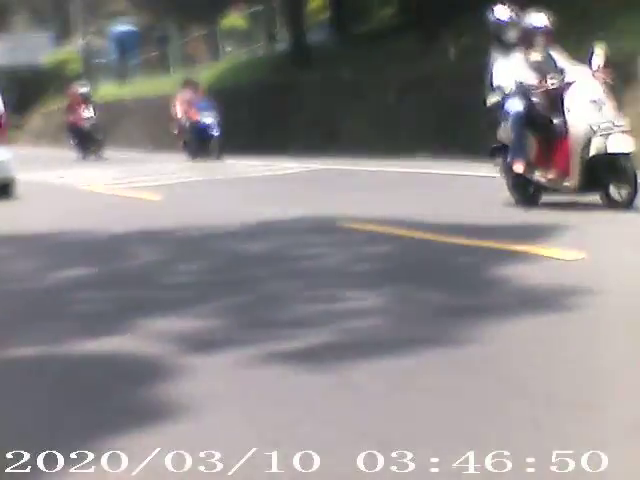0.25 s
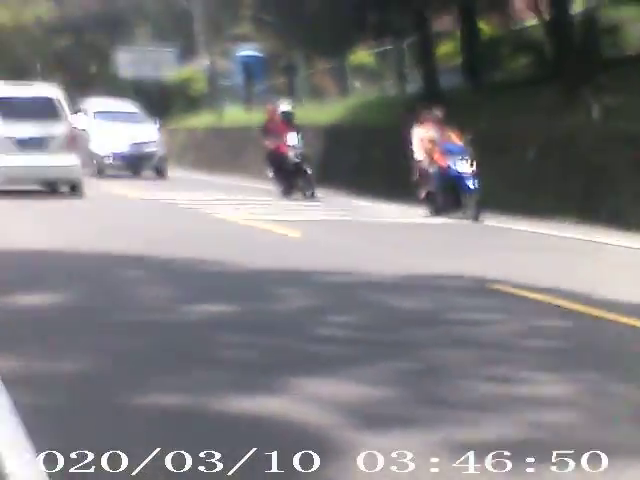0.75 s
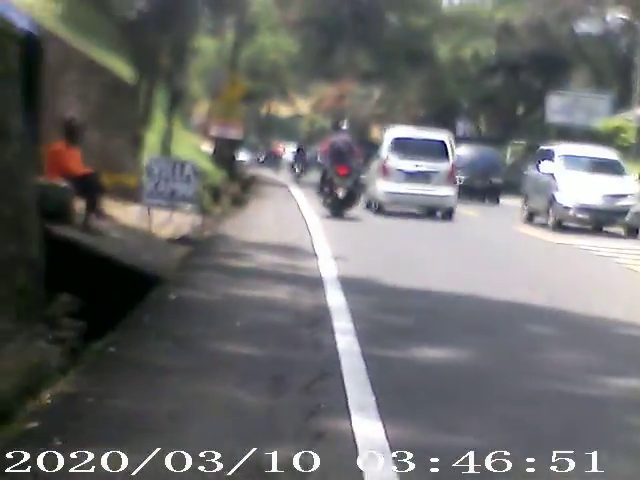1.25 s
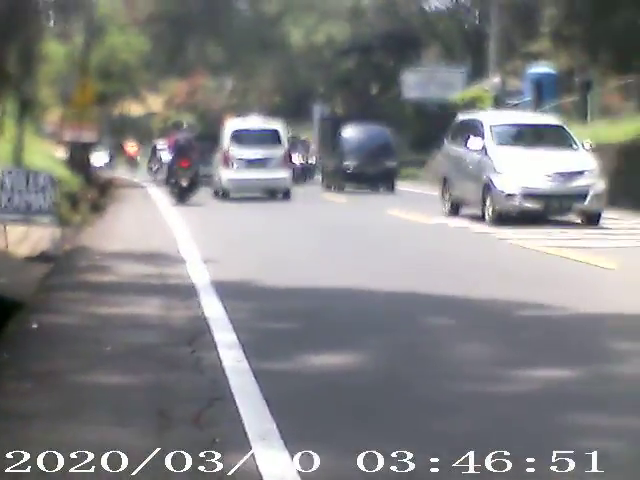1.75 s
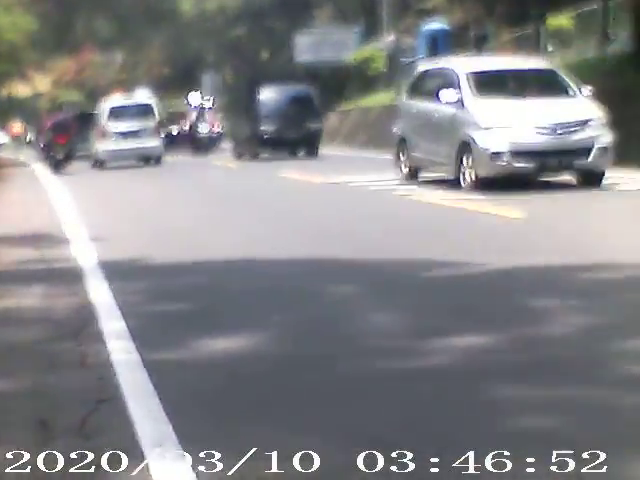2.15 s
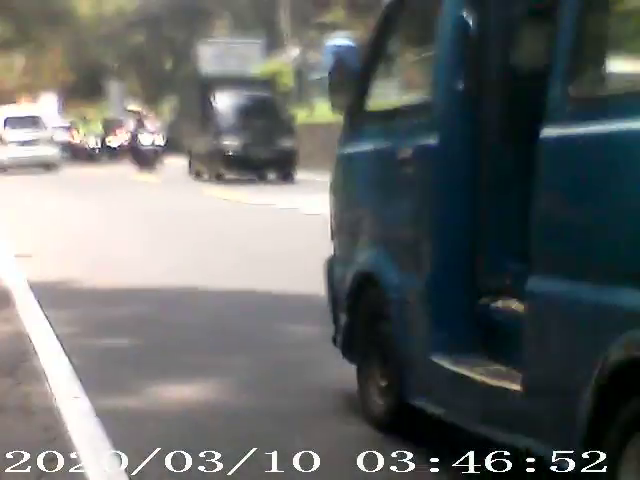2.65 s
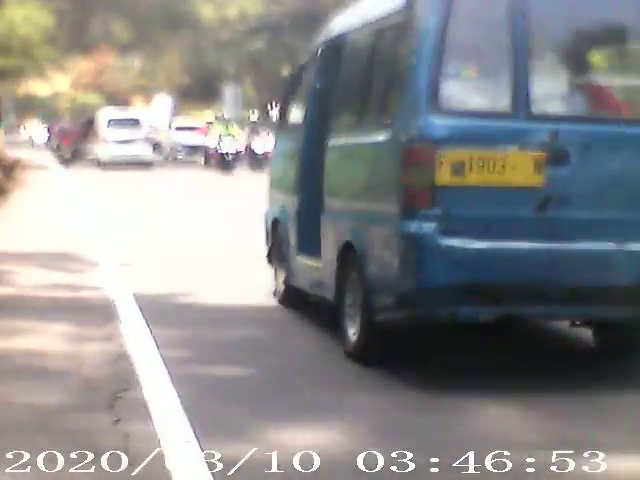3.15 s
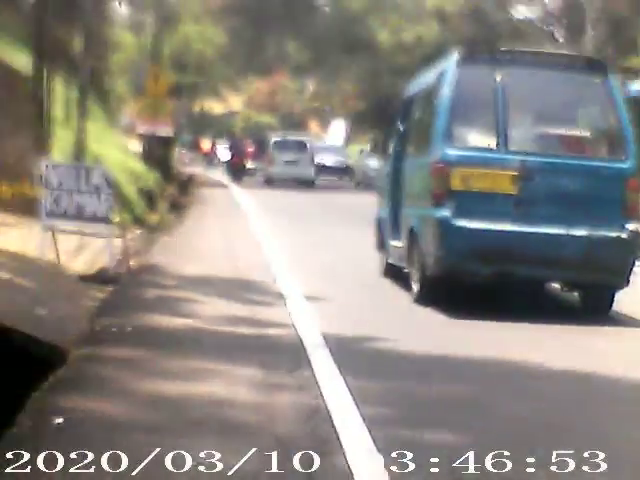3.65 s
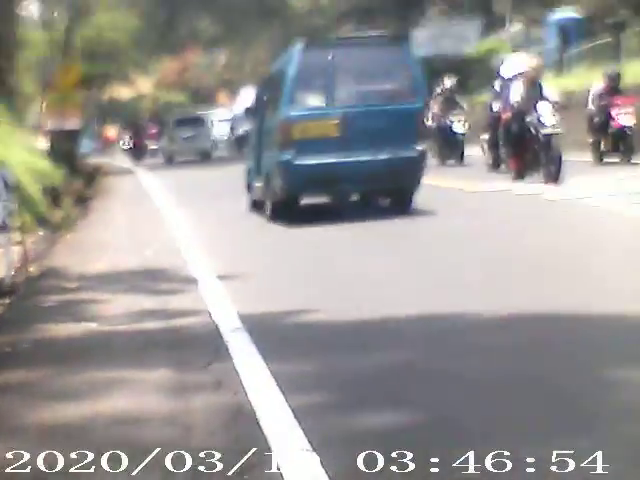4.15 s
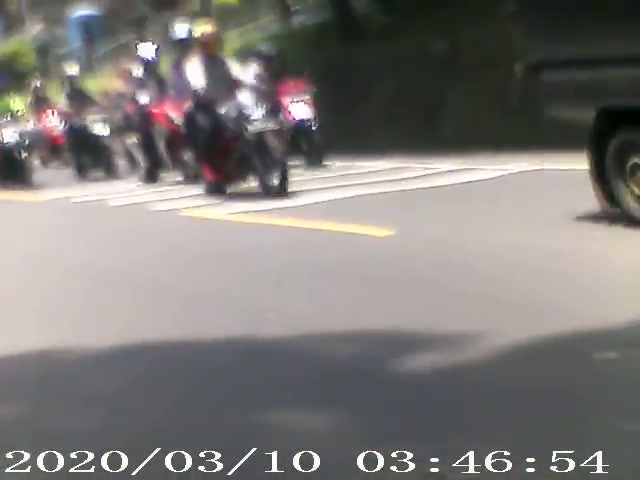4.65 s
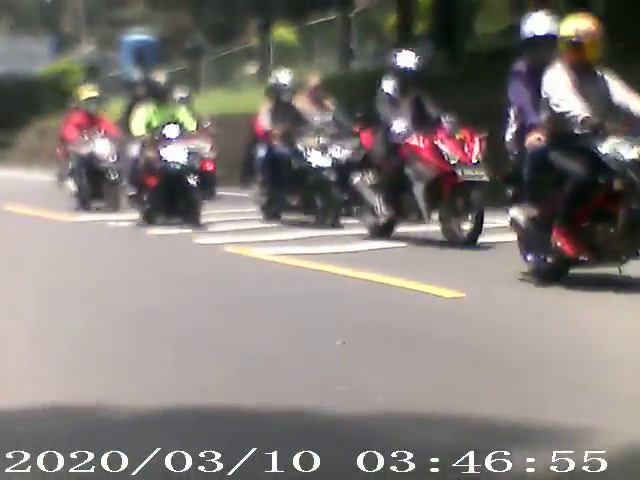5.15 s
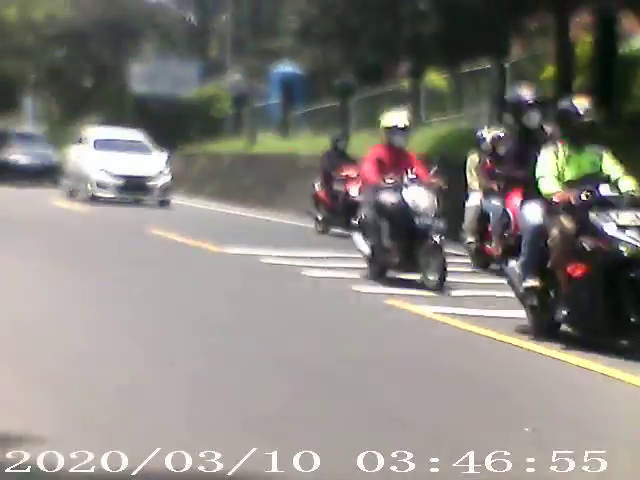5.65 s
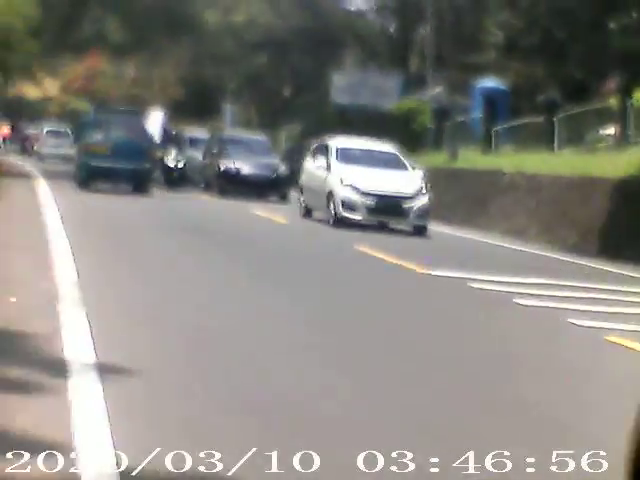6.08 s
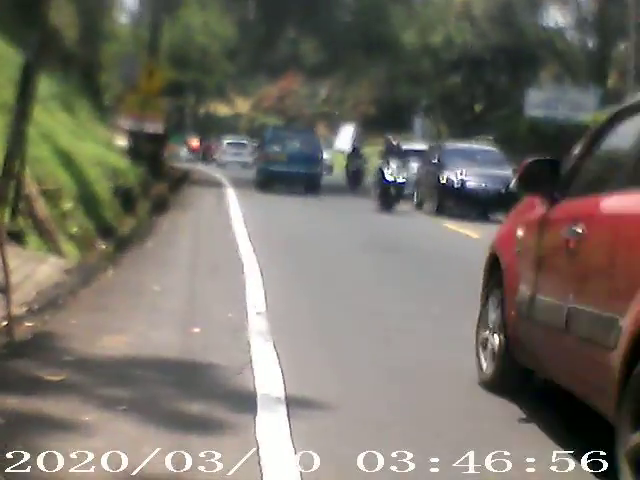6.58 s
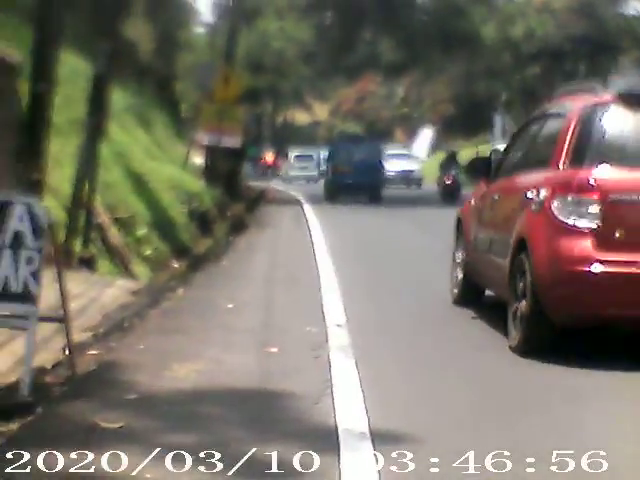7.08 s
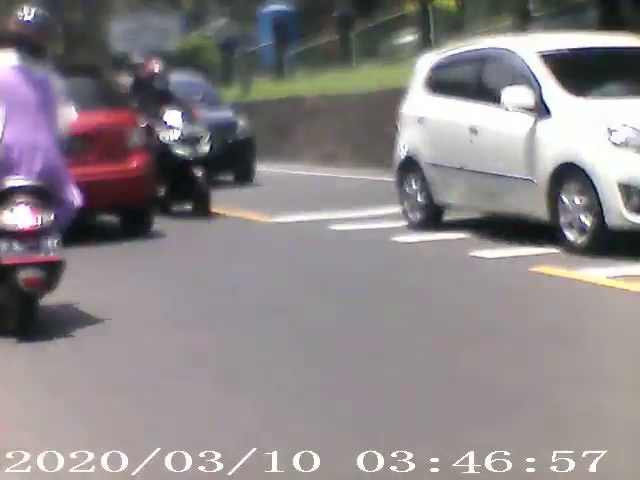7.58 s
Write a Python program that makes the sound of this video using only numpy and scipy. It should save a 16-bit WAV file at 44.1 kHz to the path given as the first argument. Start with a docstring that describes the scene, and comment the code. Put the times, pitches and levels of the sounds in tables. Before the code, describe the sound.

A small camera on a bicycle hears its plastic housing up close as it rolls along rough asphalt beside traffic. A steady, slightly gusting rush of wind and tyres lies over low frame rumble and buzzing vibration. Fine ticks, dull clacks and tiny squeaks run throughout. Knocks come at about 0.4, 0.6 and a stronger one at 1.0 seconds, then scattered softer ones until 3.6. A jolt hits at 3.9, two hard cracking slams at 4.6 and 4.8, and a rougher cluster from 5.4 to 5.9. After a calmer stretch, knocks pile up from 6.6 into a violent, clipped bang at 6.7 with a deep heave. Right afterwards, a car's faint two-note engine whine sinks with a whirr and tyre roar, fading by 7.4. Light rattling and rush continue to the end near 7.8. The microphone is narrow-band, mono and distorts on peaks.

```python
"""The plastic housing of a small camera ticks, clacks and knocks on its mount on a bicycle.
The bicycle rolls along the rough edge of a busy mountain road; the worst bumps overload the microphone.
Pushes, skids and taps ring the resonances of the housing; slams also shake the microphone directly.
Shaped noise makes the frame's rumble, the wind and the traffic.
Late on, an overtaking car adds a sinking two-note engine whine, a whirr and a tyre roar."""
import sys
import numpy as np
from scipy import signal
from scipy.fft import rfft, irfft
from scipy.io import wavfile
from scipy.ndimage import uniform_filter1d

SR = 44100
rng = np.random.default_rng(int(sys.argv[2]) if len(sys.argv) > 2 else 0)


def wav_record(signal):
    """Record a signal, one row per channel, as 16-bit PCM in the file named by sys.argv[1]."""
    frames = np.transpose(np.atleast_2d(signal))
    bounded = np.clip(frames, -1, 1)
    # unit amplitude maps onto the largest positive 16-bit level
    quanta = np.round(bounded * 32767).astype(np.int16)
    wavfile.write(sys.argv[1], SR, quanta)


N = 344862
SECONDS = np.arange(N) / SR
HIT = SECONDS[:8192]  # the time axis of one short blow, in seconds

# The overtaking car. Each row: time in seconds, pitch of the upper whine note in Hz before its wobble,
# level of the engine in dB (the tyre roar follows it, louder).
OVERTAKING = [(6.7, 1112, -110), (6.82, 1106, -52), (7.0, 1095, -48), (7.1, 1075, -49), (7.25, 1045, -57),
              (7.45, 1030, -110)]


def undb(db):
    """Turn decibels into a gain."""
    return 10 ** (np.asarray(db) / 20)


def unit(x):
    """Scale to an rms level of 1."""
    return x / np.sqrt(np.mean(x ** 2))


def curves(rows):
    """Join each column of a table by straight lines in time; the first column holds the seconds."""
    s, *columns = np.transpose(rows)
    return [np.interp(SECONDS, s, c) for c in columns]


def add(out, s, x):
    """Mix the sound x into out, starting at s seconds."""
    start = max(int(s * SR), 0)
    out[start:start + len(x)] += x[:max(N - start, 0)]


def butter(x, hz, kind, order=2):
    """Low-pass or high-pass filter."""
    return signal.sosfilt(signal.butter(order, hz, kind, fs=SR, output="sos"), x)


def resonate(x, hz, width_hz):
    """One resonance, with gain 1 at its centre."""
    return signal.lfilter(*signal.iirpeak(hz, hz / width_hz, fs=SR), x)


def noise(points):
    """Noise of rms 1 whose spectrum runs through (Hz, dB) points."""
    hz, db = np.transpose(points)
    bins = np.maximum(np.fft.rfftfreq(N, 1 / SR), 1)
    gain = undb(np.interp(np.log(bins), np.log(hz), db))
    return unit(irfft(rfft(rng.standard_normal(N)) * gain, N))


def walk(rate):
    """A smooth random curve of rms 1 that changes direction up to about rate times a second."""
    hold = int(SR / rate)
    steps = np.repeat(rng.standard_normal(N // hold + 1), hold)
    return unit(uniform_filter1d(steps, hold))[:N]


def impacts(rate, spread_db):
    """Impulses at random moments, about rate per second, of random sign and size."""
    chance, size = rng.random(N), rng.standard_normal(N)
    sign = rng.choice([-1, 1], N)
    return (chance < rate / SR) * sign * undb(spread_db * np.minimum(size, 1.4))


def moments(level_db, spread_db, count):
    """Rows (s, dB) of small events: one at random in each of count equal stretches, around a level curve."""
    place, size = rng.random((count, 2)).T
    at = ((np.arange(count) + place) * N / count).astype(int)
    return list(zip(SECONDS[at], level_db[at] + spread_db * (2 * size - 1)))


def follow(shake_db, level_db, slope, usual_db=-37):
    """The level in dB of a layer driven by the shaking: level_db when the shaking is usual."""
    return level_db + slope * (shake_db - usual_db)


def jolts(settle_s, rise_s=0.044):
    """Extra shaking in dB: for each broken patch it rises, holds and settles."""
    # Broken patches of road. Each row: start in seconds, length in seconds, extra shaking in dB.
    patches = [(3.874, 0.095, 4.5), (4.587, 0.11, 6.5), (5.607, 0.17, 6), (6.656, 0.124, 20.5)]
    total = np.zeros(N)
    for s, length, db in patches:
        corners = [s - rise_s, s, s + length, s + length + settle_s]
        total += np.interp(SECONDS, corners, [0, db, db, 0])
    return total


def housing(force):
    """The plastic housing answers a force with all its resonances at once."""
    # Its resonances. Each row: frequency in Hz, width in Hz, gain in dB.
    modes = [(207.6, 13, -4.5), (243.5, 33, -4.5), (319.5, 30, -3.5), (385.6, 25, 6), (445, 80, 0),
             (535.4, 37.7, 10.5), (567, 16, 7), (749, 76, -4), (992, 210, -6), (1270, 49, -0.5),
             (1392, 98, 3.5), (1579, 690, -6.5), (1961, 390, -0.5), (2185, 80, -22.5), (2334, 94, -12.5),
             (3085, 168, -3), (3335, 43, -13), (4176, 360, -2.5), (4700, 390, -18.5), (5640, 310, -12.5),
             (6400, 450, -59.5)]
    return sum(undb(db) * resonate(force, hz, width) for hz, width, db in modes)


def strike(force, db, size=882):
    """Ring the housing so that its first size samples have the rms level db."""
    ring = housing(force)
    return ring * undb(db) / np.sqrt(np.mean(ring[:size] ** 2))


def chatter(decay_s):
    """The force of two faces that meet and skid: a rough burst that swells and dies."""
    age = HIT / decay_s
    return age * np.exp(-age) * rng.standard_normal(len(HIT))


def ping(hz, swell_s=0.00095, rough=0.042):
    """A thin plastic edge squeaks with a rough pitch for a few milliseconds as it slips."""
    wobble = unit(uniform_filter1d(rng.standard_normal(len(HIT)), size=30))
    age = HIT / swell_s
    phase = 2 * np.pi * np.cumsum(hz * (1 + rough * wobble)) / SR
    return age ** 2 * np.exp(-age) * np.sin(phase)


def wind_and_traffic(level_db):
    """Air and passing tyres rush: shaped noise with slow, slight gusts."""
    # Colour of the rush. Each row: frequency in Hz, relative level in dB per Hz.
    rush_colour = [(100, -2.5), (180, 8), (450, 18.5), (750, 2.5), (1100, 9), (1380, 15.5), (1650, 7),
                   (2200, 9), (3700, -4), (4400, -5.5), (7000, -22.5)]
    return noise(rush_colour) * undb(level_db + 0.33 * walk(1.7))


def overtaking_engine(whirr_hz=4100, whirr_db=-5):
    """An engine goes by: a wavering two-note whine that sinks, and a whirr of narrow noise."""
    hz, db = curves(OVERTAKING)
    phase = 2 * np.pi * np.cumsum(hz * (1 + 0.0041 * walk(25))) / SR
    whine = np.sin(phase) + np.sin(.812 * phase)  # the second note is lower
    whirr = undb(whirr_db) * unit(resonate(rng.standard_normal(N), whirr_hz, 160))
    return (whine + whirr) * undb(db)


def overtaking_tyres(roar_hz=500, roar_width_hz=130, roar_db=13):
    """The tyres of the overtaking car roar as narrow noise, swelling and fading with its engine."""
    _, db = curves(OVERTAKING)
    roar = resonate(rng.standard_normal(N), roar_hz, roar_width_hz)
    roar = resonate(roar, roar_hz, roar_width_hz)
    return unit(roar) * undb(db + roar_db)


def road(buzz_db, rumble_db):
    """Tyre vibration hums in the low modes of the housing and shakes the frame; wind adds to the rumble."""
    # Colour of the rumble of frame and wind. Each row: frequency in Hz, relative level in dB per Hz.
    rumble_colour = [(15, -6), (30, -6.5), (43, -0.5), (51, 6), (60, -2), (80, -12), (100, -11),
                     (130, -35.5), (220, -68)]
    buzz = unit(housing(butter(rng.standard_normal(N), 543, "low", order=3)))
    buzz = buzz * undb(buzz_db + 3.4 * walk(18))
    rumble = noise(rumble_colour) * undb(rumble_db + 2.0 * walk(6))
    return buzz + rumble


def rattle(dull_db, fine_db):
    """The grain of the asphalt keeps loose parts busy: soft ticks and dull little clacks."""
    taps = butter(impacts(rate=70, spread_db=3.0), 2700, "high", order=1)
    fine = housing(butter(taps, 4700, "low", order=5))
    skids = signal.fftconvolve(impacts(rate=65, spread_db=3.5), chatter(0.0016))[:N]
    # the skids only set the strength; fresh noise gives the grain
    grains = resonate(np.abs(skids) * rng.standard_normal(N), 2070, 1500)
    dull = housing(butter(grains, 3400, "low", order=5))
    return undb(fine_db) * unit(fine) + undb(dull_db) * unit(dull)


def tapping(tapping_db, ping_hz=2370, ping_db=-2.0, thud_db=-0.5, thud_hz=480):
    """Between the knocks the housing nudges its mount: a faint thud and a squeak of the plastic edge."""
    out = np.zeros(N)
    push = resonate(signal.unit_impulse(len(HIT)), thud_hz, 500)
    thump = strike(butter(push, 1300, "low"), thud_db)
    for s, db in moments(tapping_db, spread_db=9, count=52):
        squeak = strike(ping(ping_hz), ping_db)
        add(out, s, undb(db) * (thump + squeak))
    return out


def ticks(ticking_db, sharp_db=-3, hard_hz=2400, contact_s=0.00016, size=1024):
    """Tiny hard parts tap the housing, each a little differently, and mostly its upper modes answer."""
    # The sharpest ticks of loose parts. Each row: time in seconds, level in dB before sharp_db.
    sharp_ticks = [(0.4112, -16), (0.489, -12), (0.602, -19.5), (0.6916, -9.5), (0.841, -11.5),
                   (1.2308, -19), (1.492, -19), (1.5625, -17), (1.967, -17), (2.2268, -13), (2.3298, -5),
                   (2.368, -17), (2.4759, -9), (2.6284, -12.5), (3.029, -11), (3.4371, -13), (3.9408, -20),
                   (4.0726, -14.5), (4.288, -14), (4.4403, -17.5), (4.7257, -17.5), (4.9636, -20.5),
                   (5.457, -17.5), (5.475, -19), (5.663, -9.5), (5.728, -6), (6.1417, -11.5),
                   (6.1682, -18.5), (6.3772, -13), (6.6321, -2), (6.7363, 1.5), (6.7585, -6), (6.7684, -6),
                   (7.0045, -21), (7.2925, -22.5), (7.3866, -14.5), (7.5115, -17), (7.7591, -11)]
    out = np.zeros(N)
    tap = strike(butter(signal.unit_impulse(size), hard_hz, "high", order=1), 0, size=44)
    sharp = [(s, db + sharp_db) for s, db in sharp_ticks]
    for s, db in sharp + moments(ticking_db, spread_db=7.5, count=280):
        contact = chatter(contact_s)[:size]
        add(out, s, signal.fftconvolve(tap, contact) * undb(db) / np.linalg.norm(contact))
    return out


def slams(heave_cycles=0.57, crack_db=20, crack_hz=1400):
    """The mount bottoms out: hard chatter rings the housing and shakes the microphone; the camera heaves."""
    # Each row: start in seconds, level of the chatter in dB, its length in seconds,
    # level of the heave in dB before it dies away, pitch of the heave in Hz.
    slam_rows = [(3.864, -14, 0.0055, -6, 161), (4.638, -4.5, 0.006, 5.5, 147),
                 (4.758, -1.5, 0.0074, 3, 151), (5.680, -13, 0.0067, -3.5, 159),
                 (5.817, -12.5, 0.009, -5.5, 150), (6.677, -8.5, 0.014, 9.5, 129),
                 (6.697, 1.5, 0.0068, 17, 48.6), (6.712, -10.5, 0.013, 7, 53.7)]
    out = np.zeros(N)
    for s, db, length, heave_db, heave_hz in slam_rows:
        age = HIT / length
        force = rng.standard_normal(len(HIT)) * np.sqrt(age) * np.exp(-age ** 4)
        ring = strike(butter(force, 1800, "high", order=1), db)
        crack = butter(force, crack_hz, "low") * undb(db + crack_db)  # straight to the microphone
        heave = np.sin(2 * np.pi * heave_hz * HIT) * np.exp(-HIT * heave_hz / heave_cycles)
        add(out, s, ring + crack + undb(heave_db) * heave)
    return out


def rocking(start_hz=410, rest_hz=225, sag_s=0.0155, swell_s=0.0092, rough=0.287, size=1544):
    """The camera rocks and scrapes on its mount, shaking the housing; the rough pitch sags as it settles."""
    scrape = unit(uniform_filter1d(rng.standard_normal(len(HIT)), size=90))
    sag = rest_hz + (start_hz - rest_hz) * np.exp(-HIT / sag_s)
    hz = sag * np.exp(rough * scrape)
    swing = HIT * np.exp(-HIT / swell_s) * np.sin(2 * np.pi * np.cumsum(hz) / SR)
    return strike(butter(swing, 400, "low"), 0, size=size)


def knocks(rock_db=-3, ping_db=-2.0, thud_hz=480, snap_hz=3300, snap_db=-4, skid_s=0.0026):
    """A soft push rings the low modes; skidding plastic rings the middle ones, snaps and squeaks."""
    # Knocks of the housing on its mount. Each row: time in seconds, level of the rocking in dB before
    # rock_db, of the thud in dB, of the clack in dB, of the squeak in dB before ping_db,
    # pitch of the squeak in Hz before its wobble.
    knock_rows = [(0.388, -17.5, -20.5, -22.5, -19.5, 2380), (0.488, -45, -48, -34, -30, 2410),
                  (0.55, -32, -26.5, -39, -48, 3520), (0.617, -19.5, -11.5, -19.5, -21, 2500),
                  (0.758, -47, -45, -43, -25.5, 2390), (1.043, -12.5, -25, -14, -13, 2560),
                  (1.2, -30, -29, -37, -40, 2400), (1.664, -27.5, -46, -34, -34, 2420),
                  (1.891, -28, -25.5, -33, -31, 2560), (1.974, -50, -41.5, -31.5, -29, 2350),
                  (2.302, -32.5, -27.5, -31, -52, 2360), (2.539, -26.5, -25, -42, -30, 2400),
                  (2.71, -29.5, -28, -52, -29, 2380), (2.953, -19.5, -27, -33, -27, 2260),
                  (3.189, -20, -18.5, -33, -31.5, 3190), (3.435, -51, -39, -34, -37, 2200),
                  (3.515, -40, -37, -46, -33, 3440), (3.62, -18.5, -26.5, -20, -19.5, 2340),
                  (3.866, -28.5, -14, -32, -14.5, 2765), (3.923, -35, -32, -36, -33, 2290),
                  (4.586, -57, -29, -22.5, -34, 2440), (4.644, -52, -37, -9, -13, 3260),
                  (4.763, -31, -27, -14, -35, 2800), (4.785, -52, -45, -25, -31, 2340),
                  (4.881, -26, -32.5, -34.5, -26, 2360), (5.051, -21.5, -20, -28, -27.5, 2100),
                  (5.299, -38, -30, -31.5, -36, 2320), (5.424, -57, -34, -33, -28, 2800),
                  (5.434, -46, -22, -16, -17.5, 2400), (5.565, -14, -23.5, -27, -25.5, 2370),
                  (5.611, -18, -15, -16, -19.5, 2430), (5.634, -23, -44, -28, -25, 2380),
                  (5.69, -41, -16.5, -15, -29, 3300), (5.823, -38, -23, -21, -24, 3010),
                  (5.841, -41, -26, -18.5, -27, 2400), (5.86, -27.5, -22, -34, -28, 2500),
                  (6.136, -53, -57, -45, -32.5, 2360), (6.221, -33.5, -34.5, -36, -31.5, 2140),
                  (6.403, -37.5, -33.5, -29.5, -59, 2350), (6.441, -33, -30.5, -35, -29.5, 2380),
                  (6.583, -9.5, -9, -17, -26, 2280), (6.6, -22, -35, -10.5, -13, 3070),
                  (6.609, -12, -19, -15, -14, 2390), (6.624, -24, -33, -24, -21, 3340),
                  (6.645, -11, -11, -18, -19, 2280), (6.656, -2.5, -9, -13, -10, 2400),
                  (6.671, -3.5, -5, -6, -24, 2200), (6.731, -12.5, -19, -29, -26, 2260),
                  (6.777, -31, -24, -29.5, -35, 2240), (7.157, -45, -39, -36, -29.5, 2340)]
    touch_s, touch_db = 0.00392, -15  # lead of the first touch; its level against the thud
    out = np.zeros(N)
    push = butter(resonate(signal.unit_impulse(len(HIT)), thud_hz, 500), 960, "low")
    thump = strike(push, 0)
    for s, rock, thud, clack, squeak, ping_hz in knock_rows:
        rub = chatter(skid_s)
        skid = butter(resonate(rub, 1200, 560), 2100, "low", order=3)
        snap = undb(snap_db) * resonate(resonate(rub, snap_hz, 730), snap_hz, 730)
        add(out, s, strike(skid + snap, clack))
        add(out, s, strike(ping(ping_hz), squeak + ping_db))
        add(out, s - touch_s, strike(skid, thud + touch_db))  # the faces brush just before they meet
        add(out, s, undb(rock + rock_db) * rocking())
        add(out, s + 0.00096, undb(thud) * thump)  # the push builds up after first contact
    return out


def scene():
    """Mix every source at the one microphone; the road drives the small sounds between the blows."""
    # How hard the asphalt shakes the bicycle. Each row: time in seconds, shaking in dB.
    roughness = [(0.0, -38), (0.37, -39), (0.59, -34.5), (0.85, -31), (1.15, -34), (2.0, -35), (2.57, -34),
                 (3.4, -38), (4.62, -38.5), (5.05, -43.5), (5.44, -41), (5.68, -31.5), (5.88, -41),
                 (6.42, -43), (6.82, -37), (7.01, -39.5), (7.71, -36.5), (7.82, -36)]
    # The fine ticking comes and goes as loose parts shift. Each row: time in seconds, relative level in dB.
    ticking_rows = [(0, -57), (.33, -58), (.8, -47.5), (1.15, -54), (1.5, -47), (1.9, -57), (2.35, -50),
                    (3.4, -49), (4.3, -49.5), (5.1, -52), (5.7, -48), (6, -52.5), (6.5, -56.5),
                    (6.8, -54.5), (6.9, -60), (7.2, -65), (7.28, -48), (7.82, -56.5)]
    # Rumble of the frame and wind on the microphone. Each row: time in seconds, relative level in dB.
    buffeting_rows = [(0, -42), (.55, -34.5), (.85, -30.5), (1.15, -33), (1.35, -30), (1.55, -34),
                      (2.1, -32.5), (2.5, -30), (3.3, -34.5), (3.6, -36), (4.25, -33.5), (4.95, -38.5),
                      (5.45, -34.5), (5.75, -34), (6.151, -35.5), (6.45, -41), (7.15, -37.5), (7.5, -33.5),
                      (7.82, -36)]
    asphalt, ticking, buffeting = (curves(rows)[0] for rows in (roughness, ticking_rows, buffeting_rows))
    # loose parts stop almost at once after a patch; the low modes hum on
    jolt, slow_jolt = jolts(settle_s=0.016), jolts(settle_s=0.23)
    shake = asphalt + jolt
    ticking = ticking + jolt
    air = wind_and_traffic(follow(shake, -40.5, slope=1))
    car = overtaking_engine() + overtaking_tyres()
    rolling = road(follow(asphalt + slow_jolt, -37, slope=0.47), buffeting + jolt + 6.5)
    loose = rattle(follow(shake, -38, slope=0.8), ticking + 11.5)
    loose = loose + tapping(follow(shake, -37, slope=0.7)) + ticks(ticking + 18)
    return (air + car + rolling + loose + slams() + knocks())[None]


def record(dry, rail=0.54, ceiling=0.72, voice_band_hz=6750, top_hz=15900):
    """The microphone amplifier saturates; a bass cut and a narrow band follow, and the peaks clip again."""
    saturated = butter(rail * np.tanh(dry / rail), 117, "high", order=1)
    narrow_filter = signal.ellip(7, .5, 65, voice_band_hz, fs=SR, output="sos")
    clipped = np.clip(signal.sosfilt(narrow_filter, saturated), -ceiling, ceiling)
    # a last steep low-pass trims the treble that the clipping adds
    top_filter = signal.ellip(8, .2, 70, top_hz, fs=SR, output="sos")
    return signal.sosfilt(top_filter, clipped)


dry = scene()
out = record(dry)
wav_record(out)
```